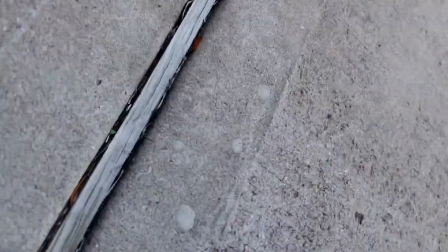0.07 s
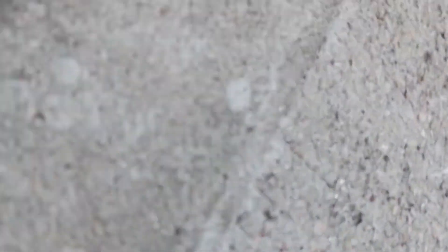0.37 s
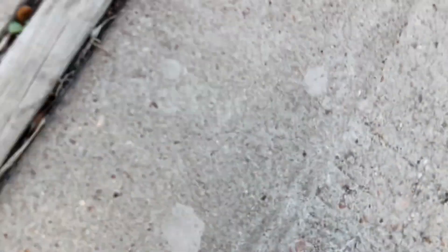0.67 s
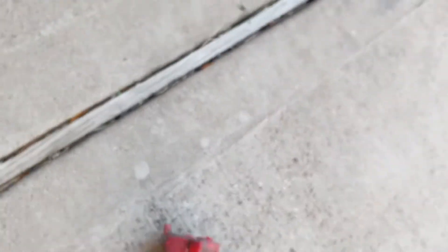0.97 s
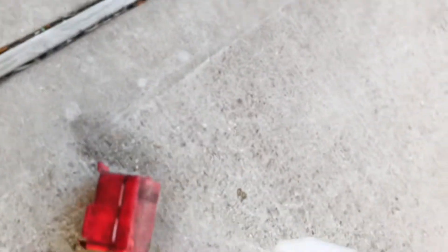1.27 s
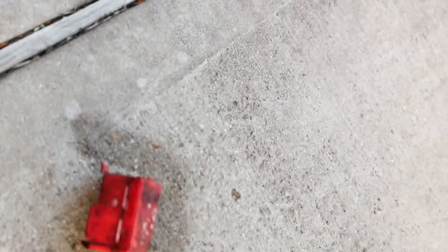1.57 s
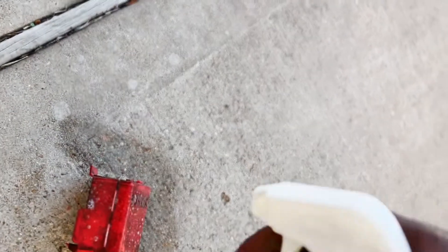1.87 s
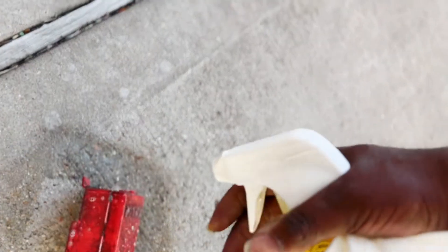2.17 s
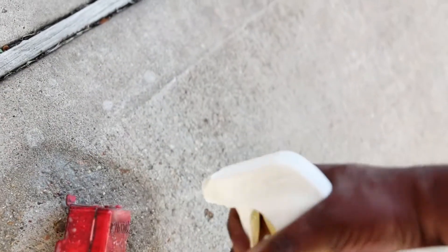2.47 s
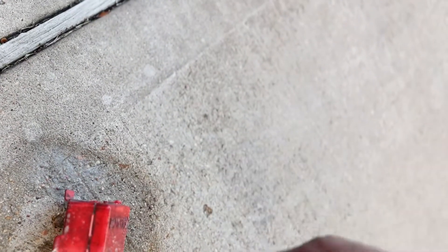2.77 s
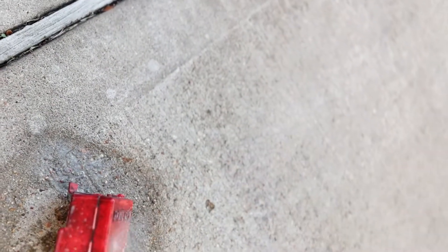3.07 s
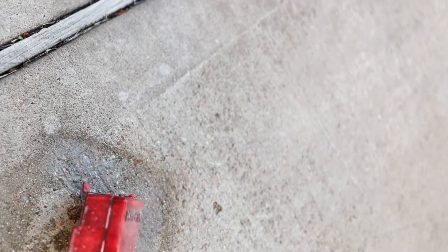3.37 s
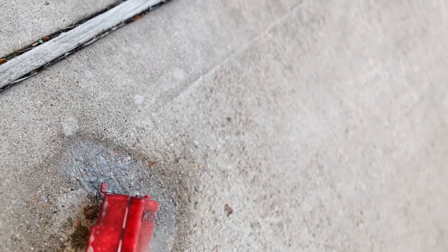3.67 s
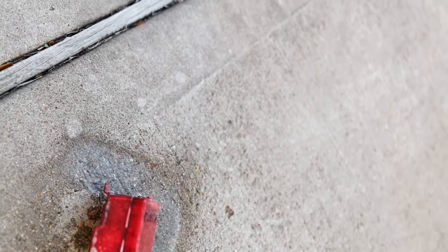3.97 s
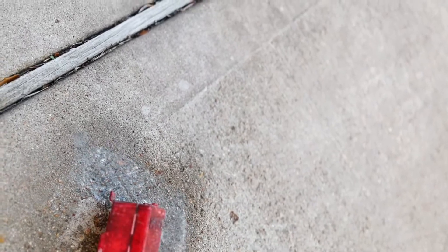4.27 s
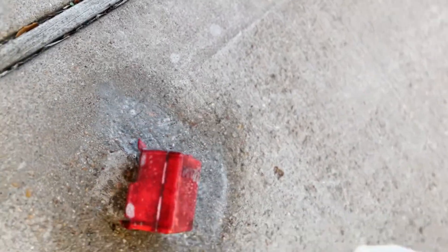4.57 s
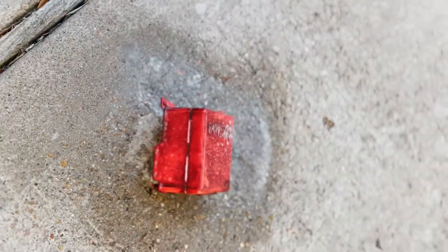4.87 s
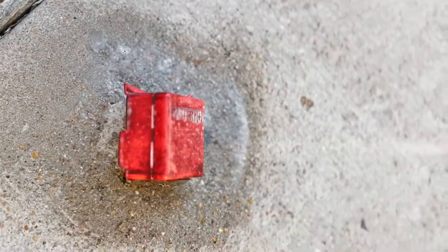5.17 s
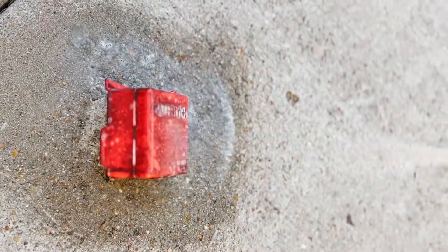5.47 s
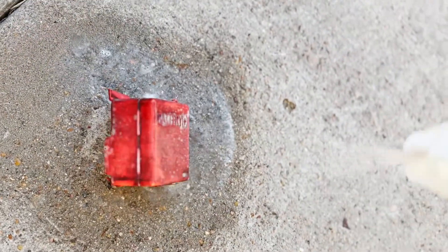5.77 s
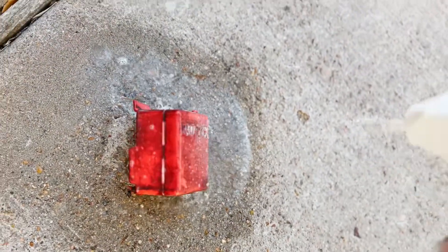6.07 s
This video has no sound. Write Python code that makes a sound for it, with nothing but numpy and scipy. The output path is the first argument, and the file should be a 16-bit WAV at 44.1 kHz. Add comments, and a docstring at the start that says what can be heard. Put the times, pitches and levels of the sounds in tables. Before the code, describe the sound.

The sound opens with light finger knocks and rubbing on a hand-held phone. From about 0.6 to 0.9 seconds come the loudest sounds: several close knocks and a boomy handling rumble. At about 1.2 seconds a trigger spray bottle begins pumping nearby, nineteen even squeezes at almost four a second, continuing to the end just after 6 seconds. Each squeeze has a small hollow valve clack, a short bright hiss slightly to the right, and droplets pattering on a small plastic part and concrete. Between squeezes the trigger springs back with a soft click and a faint sucking gurgle. Short hollow pops come from the trigger near 1.6 seconds and more clearly around 2.7 and 2.9. The hiss eases around 4 seconds and is strongest near 5.5. A low outdoor rumble and a faint distant motor hum lie underneath.

```python
"""Spray bottle on a driveway

A trigger bottle is pumped nineteen times at a small plastic part on concrete. With each squeeze a valve
clacks, the nozzle hisses and droplets patter; then the pump sucks and gurgles as it refills.
Before that, fingers knock and rub on a hand-held phone. A low outdoor rumble lies underneath."""
import sys
import numpy as np
from scipy import signal
from scipy.fft import rfft, irfft, next_fast_len
from scipy.io import wavfile

SR = 44100
rng = np.random.default_rng(int(sys.argv[2]) if len(sys.argv) > 2 else 0)


def put_to_file(sound):
    """Save the sound as 16-bit audio at rate SR, in the file named by the first command-line argument."""
    columns = np.atleast_2d(sound).T  # one column per channel
    safe = np.clip(columns, -1, 1)
    whole_steps = np.round(safe * 32767)
    wavfile.write(sys.argv[1], SR, whole_steps.astype(np.int16))


N = 269406
TIME = np.arange(N) / SR

# The trigger squeezes. Each row: start in seconds, pressure rise in seconds, length in seconds,
# hiss level in dB, clack level in dB, the clack's tick accent in dB, seconds until the trigger
# springs back, refill level in dB.
STROKES = [(1.155, 0.046, 0.15, -38, -40.5, -8, 0.21, -61.5), (1.426, 0.032, 0.13, -39, -44, -1, 0.22, -65),
           (1.695, 0.04, .12, -38.5, -38.5, -11, 0.23, -61), (1.968, 0.053, 0.12, -36, -38.5, 9, 0.21, -55),
           (2.241, 0.04, 0.11, -36, -38.5, 2, 0.23, -57.5), (2.504, 0.048, 0.1, -36, -38, 11, 0.21, -52.5),
           (2.774, 0.037, .13, -39, -38, 14.5, .2, -57), (3.042, 0.056, 0.12, -39, -44, -7, .23, -53),
           (3.318, 0.05, 0.12, -39.5, -42.5, 15, 0.22, -58.5), (3.603, 0.06, 0.1, -38.5, -42, 16, 0.2, -58),
           (3.854, 0.057, 0.1, -41.5, -42.5, -9, 0.22, -59),
           (4.117, 0.054, 0.11, -41.5, -40, 13, 0.18, -58),
           (4.359, 0.058, 0.1, -40.5, -42, -11, .213, -52.5), (4.617, .045, 0.14, -36, -41.5, 3, 0.27, -52),
           (4.907, 0.045, 0.13, -36, -39, -2, 0.23, -61), (5.197, 0.049, 0.1, -35, -38.5, 15, 0.23, -60),
           (5.475, 0.047, 0.12, -31.5, -38, 5, .25, -61.5),
           (5.758, 0.045, 0.11, -35.5, -40.5, -10, 0.2, -59),
           (6.023, 0.045, 0.12, -35.5, -39.5, 6, .21, -59)]
def spray():
    """Each squeeze drives a hissing jet, rings the pump chamber and throws drops on part and concrete."""
    jet, wet = np.zeros(N), np.zeros(N)
    for start, rise, length, hiss_db, *_ in STROKES:
        add(jet, start, undb(hiss_db) * squeeze(length, rise, fade_s=0.015))
        wet_db = -40.5 + 0.33 * (hiss_db + 36.5)
        # the splatter builds slightly faster than the hiss and has a softer tail
        add(wet, start, undb(wet_db) * squeeze(length - 0.011, 0.89 * rise, fade_s=0.02))
    drops = undb(0.5) * patter()
    chamber = undb(-13.5) * unit(band(stereo_noise(likeness=0.92), 867, 1117)) * undb(2 * walk(70))
    hiss = undb(1) * nozzle()
    part = undb(2.5) * drumming()
    return jet * hiss + wet * pan(drops + part + chamber, db=1.5)


def squeeze(length_s, rise_s, fade_s):
    """Pressure builds, holds while the piston travels, then collapses."""
    t = TIME[:SR // 2]
    build = 1 - np.exp(-(t / rise_s) ** 1.62)
    return build / np.sqrt(1 + np.exp((t - length_s) / fade_s))


# The bright tone of the mist. Each row: frequency in Hz, level in dB.
HISS = [(500, -34), (1500, -6), (3000, -4.5), (5000, -13.5), (7000, -16), (8600, 2.5), (10200, 1),
        (11600, 8), (13500, 5), (15500, 5.5), (17000, 5.5)]
# How the nozzle faces the phone. Each row: time in seconds, top treble in dB, upper mids in dB.
FACING = [(1.25, -10, -6), (1.5, -4, -8), (2.05, -2.5, 7), (2.45, -3, 1), (2.85, -3, 6.5), (3.5, -4, 8.5),
          (4.2, -1.5, -10), (4.7, -2, 9.5), (5.3, -1.5, 10), (6.1, -8, 4)]
def nozzle():
    """Liquid torn into mist: a direct hiss, its reflection and a halo of scattered sound."""
    times, top_db, middle_db = np.transpose(FACING)
    grit = rng.standard_normal(N) * undb(4.1 * rng.standard_normal(N))
    hiss = colour(grit, HISS)
    # the cone beams its treble, and flutters so that its colour keeps shifting
    top = undb(np.interp(TIME, times, top_db) + 2.0 * walk(15)) - 1
    middle = undb(np.interp(TIME, times, middle_db) + 1.1 * walk(9)) - 1
    hiss = hiss + top * band(hiss, 10800, 15300) + middle * band(hiss, 4140, 7900)
    hiss = bounce(hiss * undb(1.4 * walk(70)), lag_s=0.0026, echo_db=-5.5)
    halo = undb(-8.5) * air(HISS, likeness=0.13)
    return from_right(hiss, lag_s=0.00025) + halo


def bounce(x, lag_s, echo_db):
    """Add the reflection off the concrete; its lag shifts as the bottle sways."""
    late = TIME - lag_s * (1 + 0.0122 * walk(3))
    return x + undb(echo_db) * np.interp(late, TIME, x)


# The tone of landing drops. Each row: frequency in Hz, level in dB.
SPLATTER = [(200, -14), (450, -2.5), (700, -2), (1050, -4.5), (1500, -0.5), (2200, -0.5), (3200, 0),
            (5000, -1), (7000, -1), (9500, -2.5), (15000, -70)]
def patter(drops_per_s=9000):
    """Thousands of droplets land, each a tiny click of its own strength."""
    landings = rng.random((2, N)) < drops_per_s / SR
    drops = landings * rng.standard_normal((2, N)) * undb(0.75 * rng.exponential(size=(2, N)))
    return colour(spread(drops, likeness=0.047), SPLATTER) * undb(0.28 * walk(83))


# The resonances of the wet, hollow part. Each row: centre in Hz, width in Hz.
PART_MODES = [(1350, 400), (1800, 540), (2250, 640), (4900, 1750)]
# How squarely the jet hits the part. Each row: time in seconds, drumming level in dB.
AIM = [(1.2, -8), (1.5, -10.5), (1.78, -3), (2.1, -7.5), (3.1, -6.5), (4.2, -8), (4.7, -6.5), (5.3, -2.5),
       (6.1, -7)]
def drumming():
    """Drops ring the part; its resonances fade in and out as the jet wanders over it."""
    out = 0
    for hz, width in PART_MODES:
        mode = unit(band(stereo_noise(likeness=0.24), hz - width / 2, hz + width / 2))
        out = out + mode * undb(3 * walk(14))
    return unit(out) * undb(np.interp(TIME, *np.transpose(AIM)))


# The pump chamber's note as the bottle is turned. Each row: time in seconds, pitch in Hz.
VALVE_NOTE = [(1.15, 900), (1.7, 1038), (4.36, 1070), (4.62, 1457), (6.1, 1400)]
def valves():
    """One valve clacks as each squeeze starts, the inlet ball as the trigger springs back."""
    out = np.zeros((2, N))
    for start, _, _, _, clack_db, tick_db, back, refill_db in STROKES:
        hz = np.interp(start, *np.transpose(VALVE_NOTE))
        add(out, start, undb(clack_db) * clack(hz, tick_db))
        add(out, start + back, undb(refill_db + 11) * clack(hz=1040, tick_db=-1))
    return out


def clack(hz, tick_db):
    """A ball valve seats with a short hollow note and a plastic tick; liquid cushions the attack."""
    cushion = 1 - np.exp(-TIME[:4096] / 0.0015)
    note = undb(-4.5) * ring(hz, decay_s=0.0074) + undb(-9.5) * burst(500, 1970, decay_s=0.019)
    tick = undb(tick_db - 13) * burst(3200, 17000, decay_s=0.002)
    return cushion * (note + tick)


# The trigger's pops. Each row: start in seconds, level in dB, pitch in Hz.
POPS = [(1.614, -41.5, 1030), (2.478, -50, 1120), (2.7345, -33, 1066), (2.869, -35, 1000)]
def trigger_pops(length_s=0.0085):
    """Now and then the trigger gives a short, hollow pop."""
    out = np.zeros((2, N))
    swell = np.sin(np.pi * np.clip(TIME[:4096] / length_s, 0, 1)) ** 1.5
    for start, db, hz in POPS:
        hollow = ring(hz, decay_s=0.05) + 0.13 * ring(2.7 * hz, decay_s=0.012)
        add(out, start, undb(db) * swell * (hollow + 0.15 * burst(1500, 11000, decay_s=0.025)))
    return out


def refills(half_length_s=0.021):
    """After each squeeze, liquid and tiny bubbles are sucked through the inlet valve."""
    suck = sum(undb(db) * np.exp(-((TIME - start - back) / half_length_s) ** 2)
               for start, *_, back, db in STROKES)
    bubbles = stereo_noise(likeness=0.18) * undb(4.2 * walk(220))
    gurgle = unit(band(bubbles, 740, 3570))
    fizz = undb(-1) * unit(band(bubbles, 3200, 8300))
    return suck * (gurgle + fizz)


# Finger knocks on the phone. Each row: start in seconds, level in dB, contact hardness as an upper
# corner in Hz, ring pitch in Hz, tick accent in dB, lean to the left in dB.
KNOCKS = [(0.0551, -33.5, 960, 750, -4, 1), (.058, -47.5, 1450, 1350, 15, -1),
          (.258, -47, 2370, 1860, 2, 4), (.288, -52.5, 5900, 4370, 22, 2), (.321, -55, 6000, 4300, 24.5, 4),
          (0.6021, -15, 763, 760, 3, 4), (0.6512, -9, 2330, 1790, -23, 3), (.658, -32, 1670, 1300, 0, -2),
          (0.7, -10, 1710, 649, -19, 3), (0.7518, -24.5, 1480, 1220, -9, -2.5),
          (0.819, -36, 4860, 4650, 9, 3), (0.84, -35.5, 1220, 1300, -26, 4)]
def finger_knocks():
    """Fingers strike the phone case; harder contacts snap brighter."""
    out = np.zeros((2, N))
    for start, db, corner_hz, ring_hz, tick_db, pan_db in KNOCKS:
        # the wave takes its own path through the case to each microphone
        thud = np.array([case_wave(corner_hz, lag_cycles) for lag_cycles in (1.218, 1.084)])
        snap = burst(3800, 7500 + 1.2 * corner_hz, decay_s=0.0009)
        tick = undb(tick_db - 1.5) * spread(snap, likeness=0.19)
        spot_ring = undb(-7.5) * ring(ring_hz, decay_s=3.7 / ring_hz)
        loose_parts = undb(-16) * burst(530, 1740, decay_s=0.011)
        add(out, start, undb(db) * pan(thud + tick + spot_ring + loose_parts, pan_db))
    return out


# The phone case's resonances. Each row: centre in Hz, width in Hz, boost in dB.
CASE_MODES = [(256, 730, 12.5), (1090, 270, 5), (1390, 130, 1), (1780, 350, 12.5), (2830, 1200, 1),
              (3630, 210, 7), (4610, 190, 13.5), (5360, 480, 0), (8100, 300, 21)]
def case_wave(corner_hz, lag_cycles, size=4096):
    """A bending wave in the case: dull above the contact's corner, with the lows arriving last."""
    f = np.maximum(np.arange(size + 1) * SR / (2 * size), 1)
    boost_db = sum(db / (1 + ((f - hz) / (width / 2)) ** 2) for hz, width, db in CASE_MODES)
    rolloff = np.sqrt((1 + (f / corner_hz) ** 5) * (1 + (100 / f) ** 4))
    # folding the cepstrum makes the case ring only after the blow
    cepstrum = irfft(np.log(undb(boost_db) / rolloff))
    causal = np.exp(rfft(2 * cepstrum[:size], 2 * size))
    dispersion = np.exp(-2j * np.pi * lag_cycles * np.log(f / corner_hz))
    wave = irfft(causal * dispersion)[:size]
    return wave / np.abs(wave).max()


# The boom of the pressed case. Each row: frequency in Hz, level in dB.
CASE_RUMBLE = [(22, -12), (50, -4), (70, 0), (90, 4.5), (140, -3), (200, -12), (280, -20.5), (400, -31.5),
               (700, -37.5), (1500, -75)]
# The tone of sliding skin. Each row: frequency in Hz, level in dB.
SKIN_RUB = [(250, -5), (700, 2.5), (1200, 5.5), (1800, -7), (2900, -2.5), (6000, -2.5), (9000, -6),
            (12000, -10), (16000, -12)]
# Shifts of the hand. Each row: crest time in seconds, swell in seconds, release in seconds,
# rumble level in dB, rub level in dB, scrape level in dB.
GRIPS = [(0.064, 0.0055, .13, -45, -55.5, -59.5), (.3, 0.069, 0.019, -58, -58, -73),
         (.565, 0.028, 0.0051, -49, -55.5, -72), (0.611, 0.0072, 0.033, -44, -50, -58),
         (.65, 0.012, 0.022, -43, -56, -40.5), (.715, .02, .03, -26, -52.5, -46),
         (0.764, 0.022, .025, -21, -59, -53), (0.819, 0.05, 0.043, -16.5, -55, -62),
         (0.889, 0.05, 0.079, -33.5, -45.5, -48)]
def grip():
    """The palm drags over the phone: the case rumbles, skin rubs and a scrape rings the hollow case."""
    power = np.zeros((3, N))
    for crest, swell, release, *levels_db in GRIPS:
        shape = np.exp(-np.maximum((crest - TIME) / swell, (TIME - crest) / release))
        power += np.outer(undb(levels_db), shape) ** 2
    press, slide, drag = np.sqrt(power)
    rumble = press * air(CASE_RUMBLE, likeness=0.9)
    rub = slide * air(SKIN_RUB, likeness=0.036)
    scrape = drag * unit(band(stereo_noise(likeness=0.21), 1180, 2040))
    return rumble + pan((rub + scrape) * undb(1.2 * walk(120)), db=2)


# The far-off motor. Each row: time in seconds, level in dB.
HUM = [(0, -54), (.6, -54), (1.1, -67.5), (6.11, -67)]
def motor_hum(hz=135):
    """A distant motor hums on one slightly wavering note."""
    level = undb(np.interp(TIME, *np.transpose(HUM)))
    phase = 2 * np.pi * np.cumsum(hz + 1.82 * walk(8)) / SR
    return level * np.sqrt(2) * np.sin(phase)


# The low outdoor bed. Each row: frequency in Hz, level in dB.
LOW_AIR = [(13, -29), (22, -40), (39, -4.5), (81, 1.5), (260, -17.5), (340, -23), (570, -120)]
# The faint wash of distant noise. Each row: frequency in Hz, level in dB.
FAR_AIR = [(120, 4.5), (250, -0.5), (450, -5.5), (750, -6.5), (1200, -10.5), (2500, -17.5), (4000, -20),
           (9000, -22.5), (16000, -48)]
def outdoors(dip_at_s=1.67, dip_half_s=0.24, dip_db=-40):
    """A wavering rumble and the motor's hum lie under distant noise; the bass drops away once, briefly."""
    rumble = undb(-51 + walk(7)) * air(LOW_AIR, likeness=0.92)
    bass = rumble + motor_hum()
    dip = undb(dip_db * np.exp(-((TIME - dip_at_s) / dip_half_s) ** 4))
    distance = undb(-60) * air(FAR_AIR, likeness=0.2) * undb(walk(5.6))
    return dip * bass + distance


def undb(db):
    """Decibels to gain."""
    return 10 ** (np.asarray(db) / 20)


def unit(x):
    """Scale to rms 1."""
    return x / np.sqrt(np.mean(x ** 2))


def colour(x, points):
    """Shape the tone by a curve of (Hz, dB) points; rms 1."""
    hz, db = np.transpose(points)
    size = next_fast_len(N)
    f = np.maximum(np.arange(size // 2 + 1) * SR / size, 1)
    gain = undb(np.interp(np.log(f), np.log(hz), db, left=-100, right=-100))
    return unit(irfft(rfft(x, size) * gain, size)[..., :N])


def band(x, lo_hz, hi_hz):
    """Causal band-pass."""
    return signal.sosfilt(signal.butter(2, [lo_hz, hi_hz], "band", fs=SR, output="sos"), x)


def walk(rate_hz):
    """Smooth random wander; rms 1."""
    knots = rng.standard_normal(2048)
    return unit(np.interp(TIME * rate_hz, np.arange(len(knots)), knots))


def spread(pair, likeness):
    """Blend two unrelated signals into a partly alike stereo pair."""
    mid, side = np.sqrt(1 + likeness) * pair[0], np.sqrt(1 - likeness) * pair[1]
    return np.array([mid + side, mid - side]) / np.sqrt(2)


def stereo_noise(likeness):
    """White noise, wide at likeness 0 and mono at 1."""
    return spread(rng.standard_normal((2, N)), likeness)


def air(points, likeness):
    """Coloured stereo noise."""
    return colour(stereo_noise(likeness), points)


def pan(x, db):
    """Tilt towards the left by db."""
    return x * undb(np.array([[db], [-db]]) / 2)


def from_right(x, lag_s):
    """The sound reaches the right side first."""
    return np.array([np.roll(x, round(lag_s * SR)), x])


def add(out, start_s, x):
    """Mix x into out at start_s."""
    i = min(max(int(start_s * SR), 0), N)
    out[..., i:i + x.shape[-1]] += x[..., :N - i]


def ring(hz, decay_s, size=4096):
    """One struck mode."""
    t = TIME[:size]
    return np.sin(2 * np.pi * hz * t) * np.exp(-t / decay_s)


def burst(lo_hz, hi_hz, decay_s, size=4096):
    """A stereo scrap of noise that dies away."""
    return unit(band(rng.standard_normal((2, size)), lo_hz, hi_hz)) * np.exp(-TIME[:size] / decay_s)


def scene():
    """Bottle, hand and surroundings together."""
    return spray() + valves() + trigger_pops() + refills() + finger_knocks() + grip() + outdoors()


def record(dry):
    """The phone cuts the top treble steeply."""
    top_hz = 15750
    return signal.sosfilt(signal.ellip(10, 0.2, 70, top_hz, fs=SR, output="sos"), dry)


dry = scene()
out = record(dry)
put_to_file(out)
```